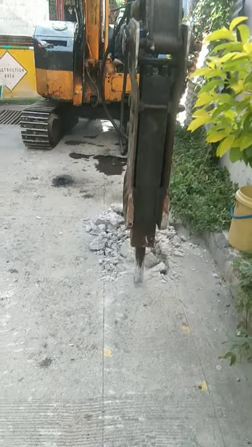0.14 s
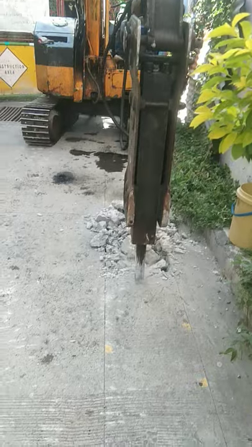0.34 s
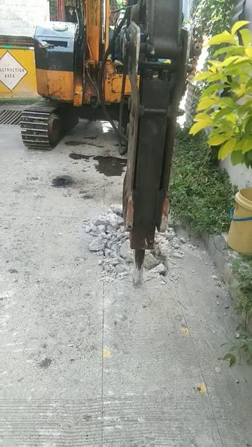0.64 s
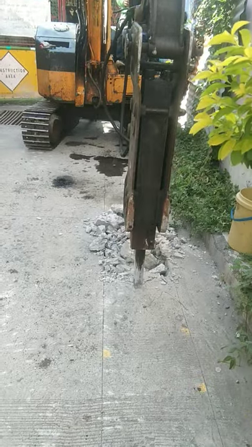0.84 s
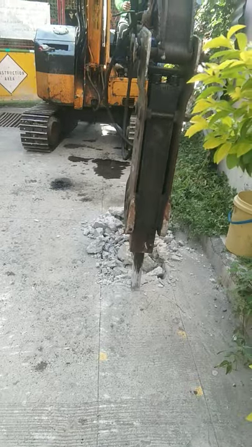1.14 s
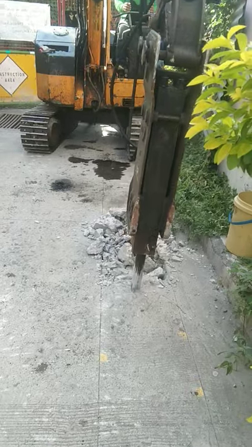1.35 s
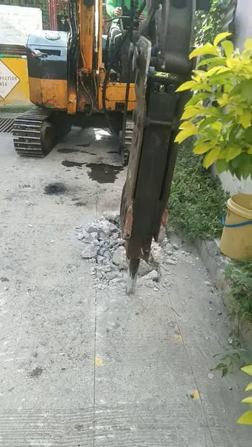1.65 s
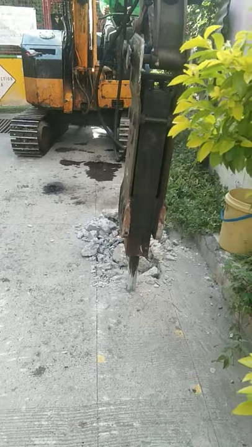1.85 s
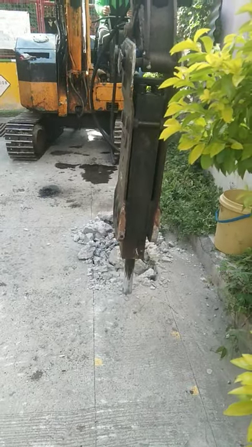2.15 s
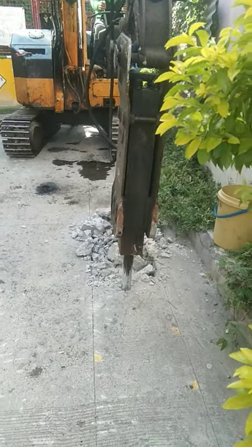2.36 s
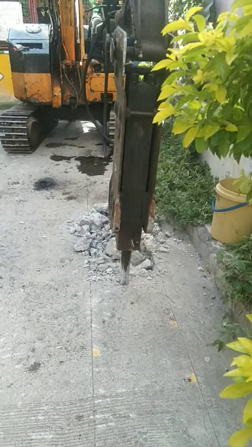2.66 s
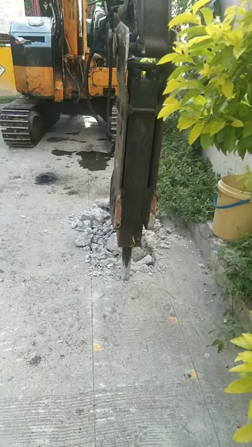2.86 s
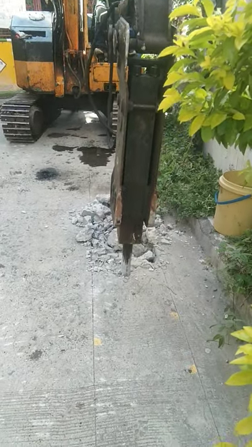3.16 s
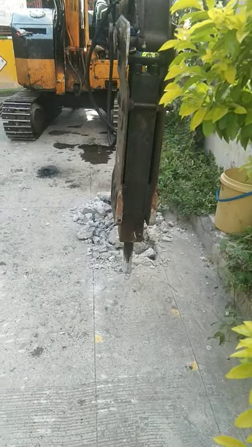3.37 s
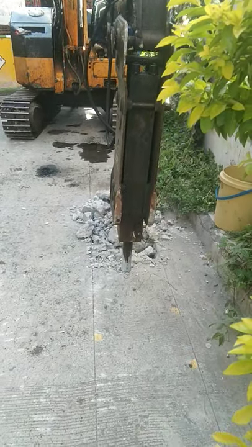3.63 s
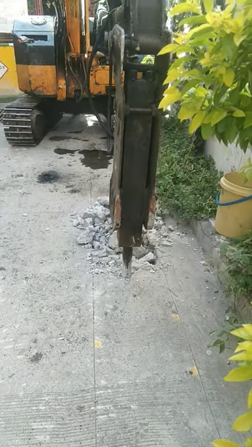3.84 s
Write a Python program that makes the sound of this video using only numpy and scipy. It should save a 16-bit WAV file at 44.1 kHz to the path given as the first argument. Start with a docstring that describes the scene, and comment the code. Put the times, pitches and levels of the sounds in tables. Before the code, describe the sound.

Loud breaker blows start abruptly and continue steadily to the end, thuddier at first, then more metallic and double-struck as the tool rebounds harder. Steady engine rumble and faint pump hum lie beneath, outdoors with a short wall echo.

```python
"""A concrete driveway: an excavator's hydraulic breaker pounds it about three times a second over a diesel engine.
Each blow is impact excitation: a valve tick, a thud in the slab and a crack that sets the steel ringing.
The tool then rebounds into its housing, harder as the concrete gives way; nearby walls return a short wash.
Dense ringing is shaped noise and distinct modes are decaying sines. The engine is a sum of orders with
throbbing noise, the pump a wavering hum. The sound begins abruptly, already inside the first blow."""
import sys
import numpy as np
from scipy import signal
from scipy.fft import rfft, irfft
from scipy.io import wavfile
from scipy.ndimage import uniform_filter1d, minimum_filter1d

SR = 44100
rng = np.random.default_rng(int(sys.argv[2]) if len(sys.argv) > 2 else 0)


def digitize_waveform(pressure):
    """Quantize a signal to 16-bit integers and store it at the path in sys.argv[1].

    Rows of a 2-D input are taken as channels; values are limited to [-1, 1].
    """
    field = np.atleast_2d(pressure).T
    bounded = np.clip(field, -1, 1)
    quanta = np.round(bounded * 32767).astype(np.int16)
    wavfile.write(sys.argv[1], SR, quanta)


N = 176400
TIME = np.arange(N) / SR  # s
AGE = np.arange(int(.6 * SR)) / SR  # time since a hit, s


def from_db(db):
    """Logarithmic level: decibels become an amplitude gain."""
    return 10 ** (np.asarray(db) / 20)


def curve(rows):
    """Linear interpolation: breakpoints become a control at every sample."""
    return np.interp(TIME, *np.transpose(rows))


def drift(rate):
    """Slow random modulation: normal values, rate of them per second, joined by straight lines."""
    return np.interp(TIME * rate, np.arange(400), rng.standard_normal(400))


PATCH_HZ = 170  # spacing of the chance peaks and dips in a spectrum


def noise(spectrum, size, patch_db=0):
    """Spectral shaping: white noise is coloured, with chance resonances if patched; rms 1."""
    hz, db = np.transpose(spectrum)
    grid = np.maximum(np.fft.rfftfreq(size, 1 / SR), 1)
    patches = patch_db * np.interp(grid / PATCH_HZ, np.arange(200), rng.uniform(-1, 1, 200))
    colour = from_db(np.interp(np.log(grid), np.log(hz), db) + patches)
    audible = grid > hz[0] / 2
    x = irfft(rfft(rng.standard_normal(size)) * colour * audible, size)
    return x / x.std()


def envelope(rise, hold, t60):
    """Exponential damping: linear rise, and from the hold time a fall of 60 dB per t60."""
    attack = np.minimum(AGE / max(rise, 1 / SR), 1)
    return attack * from_db(-60 * np.maximum(AGE - hold, 0) / t60)


def add(out, s, x):
    """Superposition: mix a sound in at a time."""
    i = int(np.clip(s * SR, 0, N))
    out[i:i + len(x)] += x[:N - i]


SAME_SHARE = 0.37  # share of the ringing's energy that repeats from hit to hit
PATCH_DB = 7
GRAIN_PER_S, GRAIN_DB = 180, 1.5  # rapid flicker of level


def bursts(times, levels_db, spectrum, shape, patch_db=PATCH_DB):
    """High modal density: one body's ringing is noise-like, partly the same at every hit, partly new."""
    out = np.zeros(N)
    same = noise(spectrum, len(AGE))
    for s, db in zip(times, levels_db):
        grain = GRAIN_DB * np.interp(AGE * GRAIN_PER_S, np.arange(200), rng.standard_normal(200))
        new = noise(spectrum, len(AGE), patch_db)
        ringing = np.sqrt(SAME_SHARE) * same + np.sqrt(1 - SAME_SHARE) * new
        add(out, s, from_db(db + grain) * shape * ringing)
    return out


SPEED_WANDER = .004  # fraction of speed, engine and pump alike
ORDER_WOBBLE_DB = 2.1

# hydraulic pump tones: (frequency [Hz], level [dB])
PUMP_TONES = [(303, -51.5), (433, -54), (560, -54.5)]


def pump():
    """Frequency and amplitude modulation: the hydraulic pump's faint tones waver."""
    turn = 2 * np.pi * np.cumsum(1 + SPEED_WANDER * drift(4.7)) / SR
    hum = sum(from_db(db + ORDER_WOBBLE_DB * drift(5.44)) * np.sin(hz * turn) for hz, db in PUMP_TONES)
    return np.sqrt(2) * hum


# engine cycle rate before wander: (time [s], rate [Hz])
CYCLE_RATE = [(0, 18.75), (4, 18.8)]
# overall exhaust level: (time [s], level [dB])
EXHAUST_LEVEL = [(0, -37), (.8, -36.5), (1.5, -36), (2.3, -40.5), (3.2, -41), (4, -38.5)]
# exhaust harmonics: (multiple of the cycle rate, relative level [dB])
EXHAUST_ORDERS = [(4, -1.5), (5, -1), (6, -1.5), (7, .5), (8, 1.5), (9, -12), (11, -15), (12, -18),
                  (14, -16)]
# colour of engine and pump noise: (frequency [Hz], relative density [dB per Hz])
MACHINE_COLOUR = [(25, 20.5), (40, 1), (80, -3), (150, 17), (220, 3.5), (500, -2.5), (800, 1.5),
                  (1600, -2.5), (3100, 1), (4500, -6.5), (7000, -7), (8500, -17.5), (12000, -39),
                  (15500, -45)]
MACHINE_DB, FIRING_DEPTH, ORDER_SCATTER_RAD = -36.5, 0.073, .6


def engine():
    """Harmonic series: a four-cylinder diesel's orders throb once a cycle; its noise swells at each firing."""
    speed = curve(CYCLE_RATE) * (1 + SPEED_WANDER * drift(3.88))
    turn = 2 * np.pi * np.cumsum(speed) / SR
    exhaust = np.zeros(N)
    for k, db in EXHAUST_ORDERS:
        strength = from_db(db + ORDER_WOBBLE_DB * drift(6.85))
        exhaust += strength * np.sin(k * turn + ORDER_SCATTER_RAD * rng.normal())
    # four firings a cycle, with a quick random flicker
    firing = (1 + FIRING_DEPTH * np.cos(4 * turn)) * from_db(drift(40))
    machine = from_db(MACHINE_DB) * firing * noise(MACHINE_COLOUR, N)
    return np.sqrt(2) * from_db(curve(EXHAUST_LEVEL)) * exhaust + machine


# colour of the walls' return: (frequency [Hz], relative density [dB per Hz])
WASH_COLOUR = [(150, -1), (400, 3), (700, -3.5), (1100, 3), (1500, 1), (3100, 4.5), (4500, -7), (7000, -5),
               (8500, -52), (12000, -52), (15500, -43)]
WASH_DB, WASH_RISE_S, WASH_HOLD_S, WASH_T60_S = -28, 0.013, 0.11, 0.3


def wash(times, levels_db):
    """Reverberation: nearby walls return each blow as a short diffuse decay."""
    return bursts(times, levels_db + WASH_DB, WASH_COLOUR, envelope(WASH_RISE_S, WASH_HOLD_S, WASH_T60_S))


# loose knocks between blows: (time [s], level [dB], centre frequency [Hz])
LOOSE_KNOCKS = [(0.925, -29.5, 1040), (.923, -34, 1720), (1.421, -32, 3100), (3.852, -29, 6350),
                (3.852, -37, 3500)]


def knocks(skirt_db=-13, t60=0.11):
    """Narrow-band impact: the loose tool knocks lightly now and then."""
    out = np.zeros(N)
    for s, db, hz in LOOSE_KNOCKS:
        colour = [(hz * .8, skirt_db), (hz, 0), (hz * 1.2, skirt_db), (hz * 2, 5 * skirt_db)]
        add(out, s, from_db(db) * envelope(0.001, 0.0054, t60) * noise(colour, len(AGE)))
    return out


BOOM_HZ, BOOM_DB, BOOM_RISE_S, BOOM_HOLD_S, BOOM_T60_S = 1087, -30.5, 0.11, 0.09, 0.28
BOOM_FOLLOWS = 0.35  # share of the rebound's change in level


def boom(times, levels_db):
    """Slow energy build-up: the excavator's arm takes up each blow and rings on in a narrow cluster."""
    out = np.zeros(N)
    skirts = [(.7, -50), (.9, -14), (1, 0), (1.1, -14), (1.4, -60)]
    colour = [(BOOM_HZ * ratio, db) for ratio, db in skirts]
    shape = envelope(BOOM_RISE_S, BOOM_HOLD_S, BOOM_T60_S)
    for s, db in zip(times, levels_db):
        add(out, s, from_db(BOOM_DB + BOOM_FOLLOWS * db) * shape * noise(colour, len(AGE)))
    return out


PLATE_HZ, PLATE_DB, PLATE_T60_S = 983, -16.5, 0.23
PLATE_SPREAD = 0.0276  # random fraction of pitch


def plates(times, levels_db):
    """Beating: the housing's two side plates clonk, a little apart in pitch."""
    out = np.zeros(N)
    shape = envelope(0.0031, 0.007, PLATE_T60_S)
    for s, db in zip(times, levels_db):
        pair = np.zeros(len(AGE))
        for _ in range(2):
            hz = PLATE_HZ * (1 + PLATE_SPREAD * rng.normal())
            pair += np.sin(2 * np.pi * (hz * AGE + rng.random()))
        add(out, s, from_db(PLATE_DB + db) * shape * pair / 2)
    return out


STEEL_SPREAD_DB, STEEL_RISE_S = 3.0, .006
STEEL_DETUNE = .0025  # random fraction of pitch

# trend of the housing's weaker partials: (frequency [Hz], relative level [dB])
PARTIAL_TREND = [(1500, -5.5), (3200, 2.5), (5000, -6), (7000, -10), (8500, -9), (10000, -5), (12000, -28),
                 (15500, -22)]
PARTIALS_BLOW_DB, PARTIALS_REBOUND_DB, PARTIALS_T60_S = -18.5, -20, 0.25


def partials(times, levels_db, count=120):
    """Modal superposition: each hit shares its energy anew among a dense, uneven set of housing partials."""
    out, shape = np.zeros(N), envelope(STEEL_RISE_S, 0, PARTIALS_T60_S)
    hz = np.geomspace(1500, 15500, count) * (1 + .012 * rng.standard_normal(count))
    gain = from_db(np.interp(hz, *np.transpose(PARTIAL_TREND)) + 7 * rng.uniform(-1, 1, count))
    bins = (hz * len(AGE) / SR).astype(int)
    for s, db in zip(times, levels_db):
        lines = np.zeros(len(AGE) // 2 + 1, complex)
        lines[bins] = gain * (rng.standard_normal(count) + 1j * rng.standard_normal(count))
        ring = irfft(lines, len(AGE))
        add(out, s, from_db(db) * shape * ring / ring.std())
    return out


def cluster(hz, count=3):
    """Mode splitting: one mode becomes close partials that beat; as strong as a unit sine."""
    pitches = hz * (1 + STEEL_DETUNE * rng.standard_normal((count, 1)))
    phases = 2 * np.pi * (pitches * AGE + rng.random((count, 1)))
    return np.sin(phases.astype(np.float32)).sum(0) / np.sqrt(count)


# tool and housing modes: frequency [Hz]: (blow level [dB], rebound level [dB], t60 [s])
STEEL_MODES = {1346: (-27, -60, 0.3), 2350: (-26, -31.5, 0.34), 2478: (-24.5, -59, 0.3),
               3068: (-27, -24, 0.3), 3110: (-16, -17, 0.21), 3331: (-18.5, -18, 0.073),
               3490: (-18, -24.5, 0.28), 3888: (-31, -27, 0.2), 4338: (-16, -47, 0.17),
               4544: (-43, -19.5, 0.18), 5326: (-24, -24.5, .28), 5436: (-31, -29, .22),
               6181: (-35.5, -27, 0.3), 6437: (-24.5, -16, 0.16), 7128: (-19, -22, 0.23),
               7849: (-42, -27, 0.31)}


def steel(times, levels_db, on_rebound):
    """Modal excitation: every hit drives the steel's modes with new strengths."""
    out = np.zeros(N)
    for hz, (blow_db, rebound_db, t60) in STEEL_MODES.items():
        mode_db = rebound_db if on_rebound else blow_db
        shape = envelope(STEEL_RISE_S, 0, t60)
        for s, db in zip(times, levels_db):
            strength = from_db(db + mode_db + STEEL_SPREAD_DB * rng.normal())
            add(out, s, strength * shape * cluster(hz))
    return out


CHISEL_DB, CHISEL_T60_S = -6, .075


def chisel(times, notes_hz, levels_db):
    """Boundary conditions: the chisel's seating decides which one resonance stands out in a blow."""
    out = np.zeros(N)
    shape = envelope(STEEL_RISE_S, 0, CHISEL_T60_S)
    for s, hz, db in zip(times, notes_hz, levels_db):
        add(out, s, from_db(CHISEL_DB + db) * shape * np.sin(2 * np.pi * hz * AGE))
    return out


# colour of tool-on-housing contact: (frequency [Hz], relative density [dB per Hz])
CONTACT_COLOUR = [(400, -10.5), (1000, -3.5), (2200, -3), (3150, 5.5), (3600, 4.5), (4400, 7), (5600, -1.5),
                  (6500, 3.5), (8300, -13.5), (10000, -19), (12000, -37), (15500, -54)]
REBOUND_DB, REBOUND_RISE_S, REBOUND_HOLD_S, REBOUND_T60_S = -9, .007, .011, .035
RATTLE_DB, RATTLE_RISE_S, RATTLE_HOLD_S, RATTLE_T60_S = -25.5, 0.021, 0.039, 0.26
TICK_DB, TICK_LEAD_S, TICK_T60_S = -21.5, .0071, .09
CHATTER_BEFORE_S, CHATTER_AFTER_S, CHATTER_T60_S = .042, .055, .04
CHATTER_DB, CHATTER_SPREAD_DB, CHATTER_PATCH_DB = -20.5, 1.5, 12
CHATTER_FADE_DB = 8.5  # over the whole span of touches


def rebound(times, levels_db):
    """Elastic recoil: the tool springs back into its housing, which then rattles on."""
    bang = envelope(REBOUND_RISE_S, REBOUND_HOLD_S, REBOUND_T60_S)
    rattle = envelope(RATTLE_RISE_S, RATTLE_HOLD_S, RATTLE_T60_S)
    out = bursts(times, levels_db + REBOUND_DB, CONTACT_COLOUR, bang)
    return out + bursts(times, levels_db + RATTLE_DB, CONTACT_COLOUR, rattle)


def chatter(times, levels_db, count=5):
    """Repeated glancing contact: around each rebound the tool touches its bushings unevenly, ever more weakly."""
    spot = (np.arange(count) + rng.random((len(times), count))) / count  # 0 to 1 across the span
    s = times[:, None] - CHATTER_BEFORE_S + (CHATTER_BEFORE_S + CHATTER_AFTER_S) * spot
    spread = CHATTER_SPREAD_DB * rng.standard_normal(spot.shape)
    db = levels_db[:, None] + CHATTER_DB - CHATTER_FADE_DB * (spot - .5) + spread
    shape = envelope(0.0044, 0.004, CHATTER_T60_S)
    return bursts(s.ravel(), db.ravel(), CONTACT_COLOUR, shape, CHATTER_PATCH_DB)


def tick(times, levels_db):
    """Transient excitation: the valve clicks just ahead of each blow."""
    return bursts(times - TICK_LEAD_S, levels_db + TICK_DB, CONTACT_COLOUR, envelope(0.00036, 0, TICK_T60_S))


# colour of the blow's clatter: (frequency [Hz], relative density [dB per Hz])
CLATTER_COLOUR = [(130, 5), (350, -5.5), (700, 0.5), (1050, 3.5), (1450, 0.5), (2400, 5.5), (3200, 0),
                  (4800, 0.5), (7000, 1.5), (8300, -15), (10000, -18.5), (12000, -41), (15500, -29)]
CLATTER_DB, CLATTER_RISE_S, CLATTER_HOLD_S, CLATTER_T60_S = -16, 0.0017, 0.014, 0.27


def clatter(times, levels_db):
    """Broadband ringing: a longer clatter decays after each blow."""
    shape = envelope(CLATTER_RISE_S, CLATTER_HOLD_S, CLATTER_T60_S)
    return bursts(times, levels_db + CLATTER_DB, CLATTER_COLOUR, shape)


# slab modes: (frequency [Hz], level [dB], t60 [s])
SLAB_MODES = [(135.6, -21, 0.2), (204.9, -17.5, 0.19), (234.6, -27, 0.45), (278.3, -28.5, 0.26),
              (335.7, -23.5, 0.17), (432, -32, 0.055), (557, -25, 0.19), (782, -18, 0.052)]
THUD_HZ, THUD_DB, THUD_LAG_S = 436, -4, 0.0022


def slab(times, levels_db):
    """Elastic deflection: the concrete dips and springs back in one broad thud, then rings dully."""
    out = np.zeros(N)
    x = (np.pi * THUD_HZ * (AGE - THUD_LAG_S)) ** 2
    thud = from_db(THUD_DB) * (2 * x - 1) * np.exp(-x)
    for s, db in zip(times, levels_db):
        ring = np.zeros(len(AGE))
        for hz, mode_db, t60 in SLAB_MODES:
            tone = np.sin(2 * np.pi * (hz * AGE + rng.random()))
            ring += from_db(mode_db + rng.normal()) * envelope(THUD_LAG_S, 0, t60) * tone
        add(out, s, from_db(db) * (thud + ring))
    return out


# colour of the crack: (frequency [Hz], relative density [dB per Hz])
CRACK_COLOUR = [(600, -13), (1000, -17), (1800, -3), (3200, 3.5), (4400, 9), (5600, 0), (7000, -2),
                (8500, -7), (12000, -20), (15500, -27)]
CRACK_DB, CRACK_LAG_S, CRACK_RISE_S, CRACK_HOLD_S, CRACK_T60_S = -11, 0.00049, 0.0035, 0.0037, 0.044


def crack(times, levels_db):
    """Impulsive radiation: each blow gives a short bright crack."""
    shape = envelope(CRACK_RISE_S, CRACK_HOLD_S, CRACK_T60_S)
    return bursts(times + CRACK_LAG_S, levels_db + CRACK_DB, CRACK_COLOUR, shape)


# breaker blows, levels relative to each layer's own: (time [s], crack [dB], slab thud [dB], clatter [dB],
# steel ring [dB], chisel note [Hz], chisel note [dB], side plates [dB], rebound delay [s], rebound [dB])
BREAKER_BLOWS = [(.03, 0, 1, 2, -2, 2700, -8, -17, 0.081, -16),
                 (0.3397, -2.5, -0.5, 0.5, -5, 5150, -3.5, -19, .056, -14.5),
                 (0.6514, 0.5, 1, -.5, -2.5, 5420, -6, -5.5, 0.045, -32),
                 (0.96, -0.5, 0, 0.5, -2.5, 3170, -16, -16, 0.061, -12),
                 (1.2624, 0, 0.5, -.5, -5, 2950, -12, -3, 0.062, -7.5),
                 (1.5593, -3, -3, 1.5, -2.5, 2994, 1.5, -1, 0.059, -11.5),
                 (1.8572, -3.5, -3, 0.5, -11, 3050, 2, -4, 0.06, -4.5),
                 (2.1685, -0.5, -3, 1, 1, 3533, -2, -6, 0.057, -1.5),
                 (2.4693, -2, -5.5, -2, -1, 3497, -3, -15, 0.052, 3),
                 (2.7628, -2.5, -5.5, -0.5, 0.5, 3520, -6, -19, .058, 1),
                 (3.055, -1.5, -7.5, -2.5, -0.5, 4280, -1, -0.5, 0.054, 2),
                 (3.3458, -0.5, -11, -0.5, -3.5, 4270, -4, -1, 0.055, 3.5),
                 (3.643, -0.5, -7, -3.5, -1.5, 4250, 0, 1.5, 0.055, 5),
                 (3.957, 0, -7.5, -5, -3.5, 4335, -3.5, -19, 0.052, 1.5)]


def breaker():
    """Impact and recoil: valve tick, blow, rebound and the wash from the walls."""
    (s, crack_db, thud_db, clatter_db, ring_db,
     note_hz, note_db, plate_db, delay, rebound_db) = np.transpose(BREAKER_BLOWS)
    back = s + delay
    blow = tick(s, crack_db) + slab(s, thud_db) + crack(s, crack_db) + clatter(s, clatter_db)
    recoil = rebound(back, rebound_db) + chatter(back, rebound_db)
    ring = steel(s, ring_db, on_rebound=False) + steel(back, rebound_db, on_rebound=True)
    partial_db = np.r_[ring_db + PARTIALS_BLOW_DB, rebound_db + PARTIALS_REBOUND_DB]
    ring += partials(np.r_[s, back], partial_db)
    ring += chisel(s, note_hz, note_db) + plates(s, plate_db) + boom(s, rebound_db)
    return blow + recoil + ring + wash(s, clatter_db)


def scene():
    """Superposition: pump, engine, loose knocks and breaker sum to one channel."""
    return (pump() + engine() + knocks() + breaker())[None]


LOW_CUT_HZ, CUTOFF_HZ, START_S = 33, 15850, .082
LIMIT_DB, LIMIT_WINDOW_S = -1.97, 0.0059


def record(dry):
    """Band and peak limiting: deep bass is shed, a fast limiter holds peaks, sound opens abruptly, top is cut."""
    low_cut = signal.butter(3, LOW_CUT_HZ, "high", fs=SR, output="sos")
    thinned = signal.sosfilt(low_cut, dry)
    window = max(int(LIMIT_WINDOW_S * SR), 1)
    allowed = 1 / np.maximum(np.abs(thinned) / from_db(LIMIT_DB), 1)
    gain = uniform_filter1d(minimum_filter1d(allowed, window), window)
    opened = gain * thinned * (TIME >= START_S)
    top_cut = signal.ellip(10, .1, 90, CUTOFF_HZ, fs=SR, output="sos")
    return signal.sosfilt(top_cut, opened)


dry = scene()
out = record(dry)
digitize_waveform(out)
```